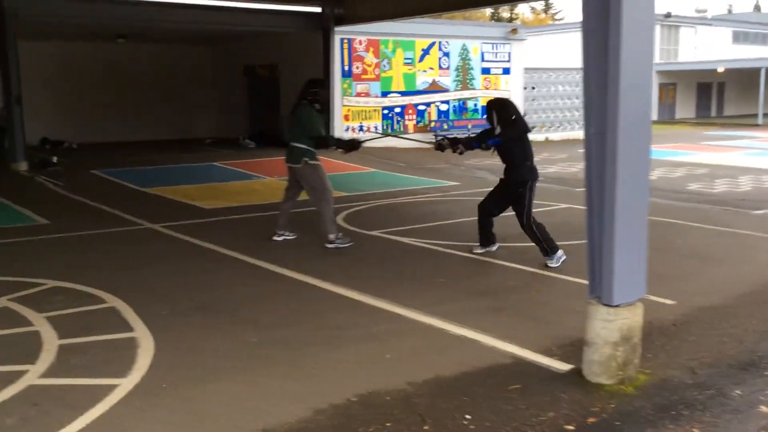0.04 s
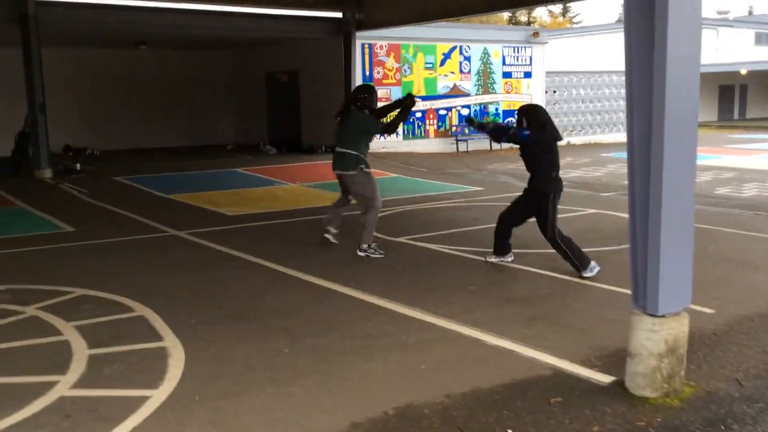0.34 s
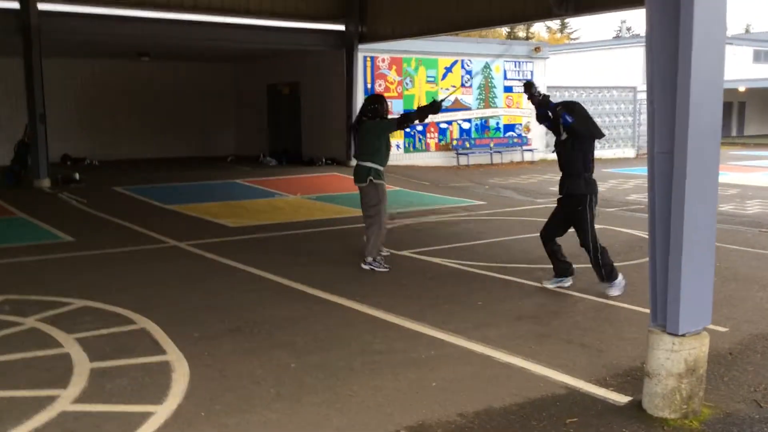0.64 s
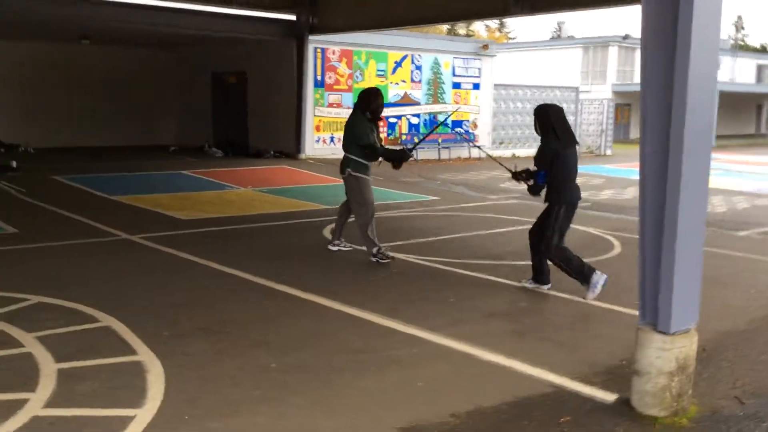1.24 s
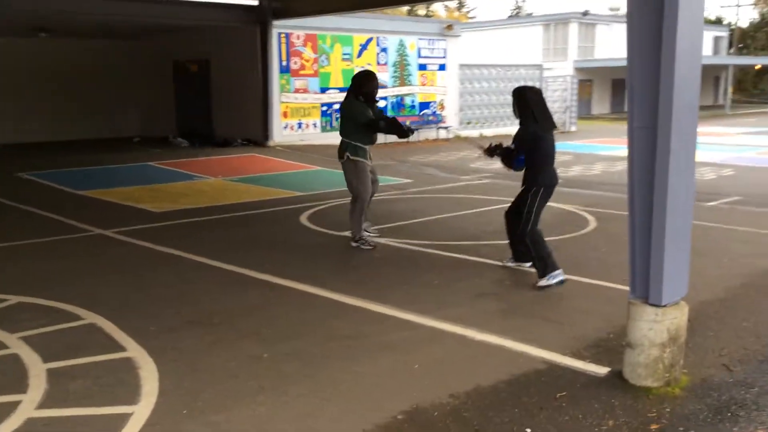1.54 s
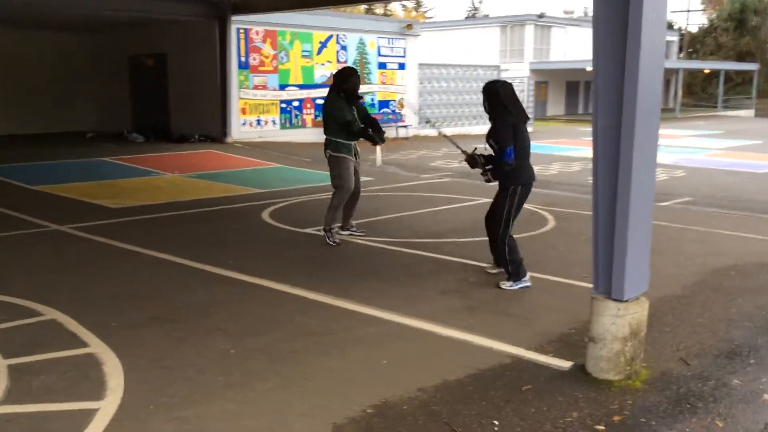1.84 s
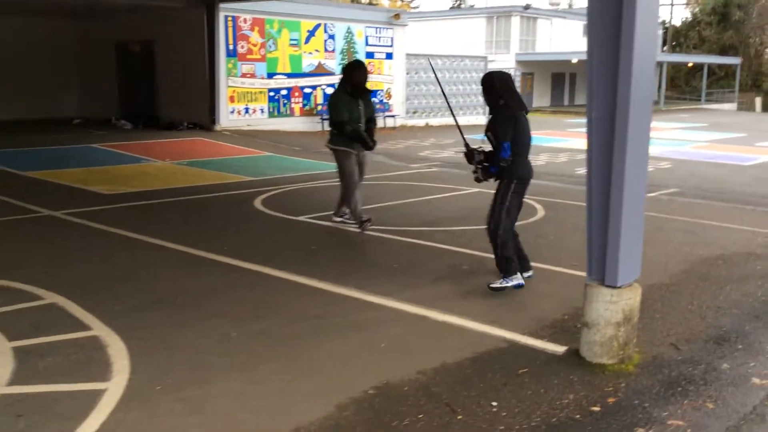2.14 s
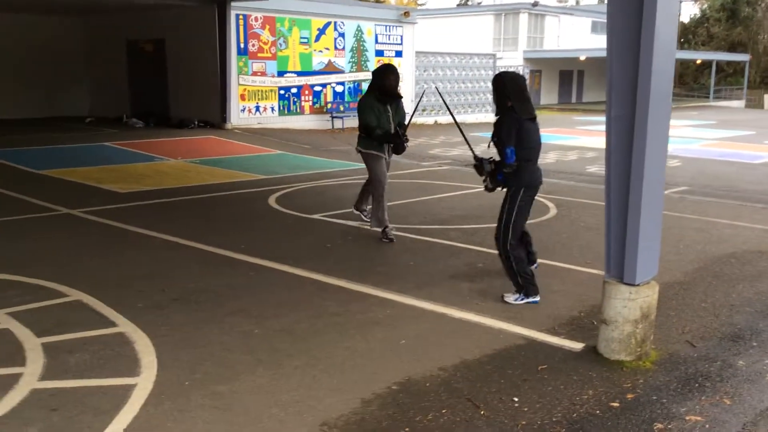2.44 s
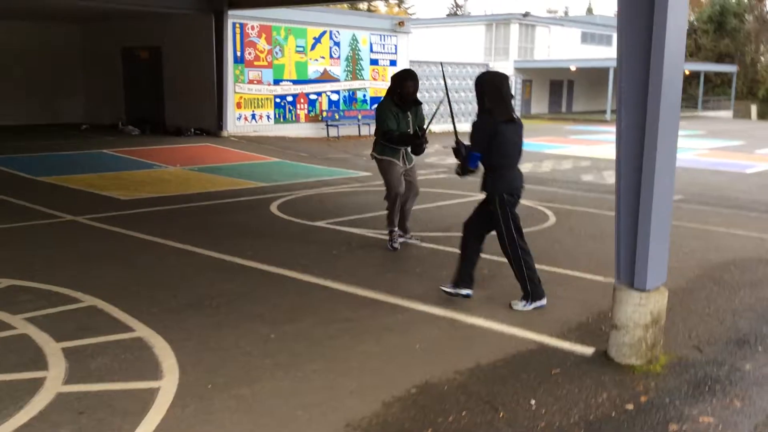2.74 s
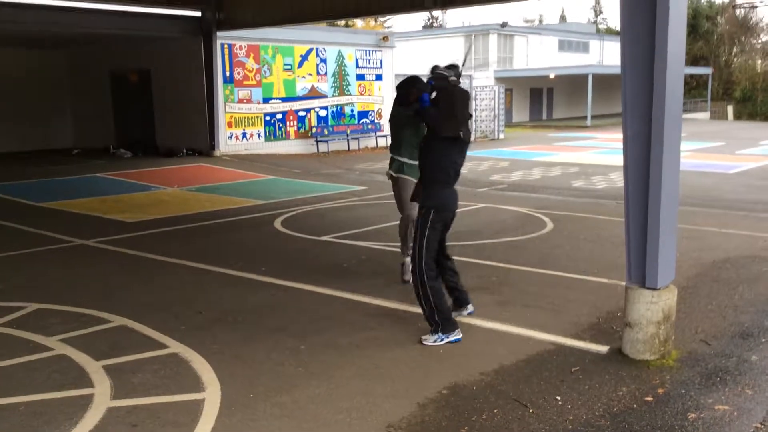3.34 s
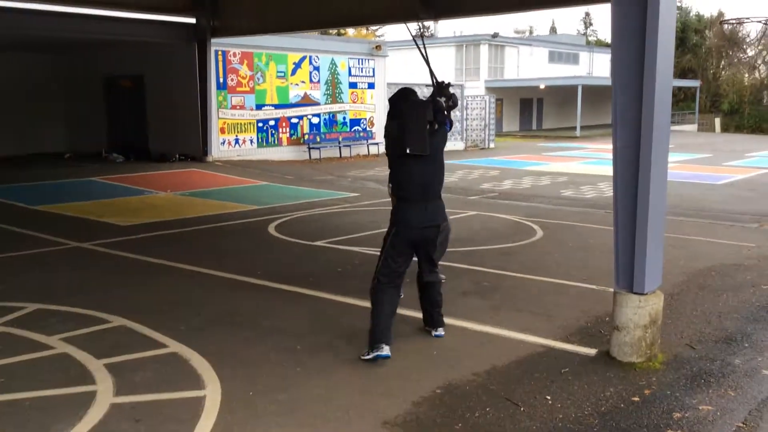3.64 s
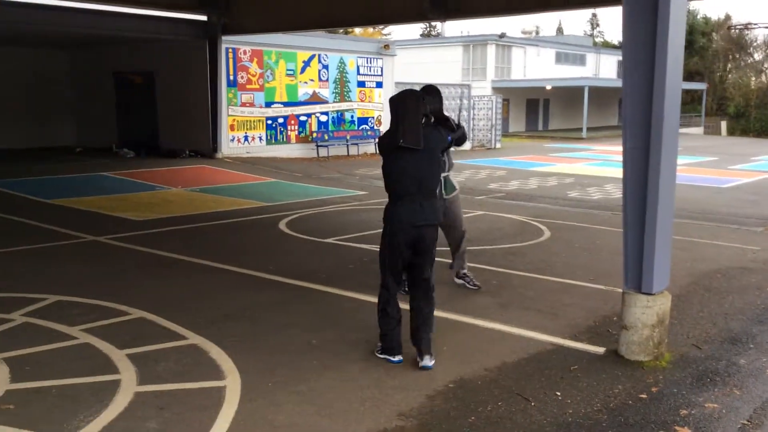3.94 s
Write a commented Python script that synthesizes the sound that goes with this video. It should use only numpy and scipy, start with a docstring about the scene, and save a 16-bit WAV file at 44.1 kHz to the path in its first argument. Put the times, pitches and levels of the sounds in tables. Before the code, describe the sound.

Steel swords clash and scrape, ringing under an echoing roof, with soft footsteps.

```python
"""On a roofed outdoor court, two fencers spar with steel swords a few metres away.
The blades clash, chatter and slide along each other, which sets them and their hand guards ringing.
The roof and walls answer with a long, bright echo. Shoes pad and scuff on the asphalt,
dull knocks sound close by, and the town rumbles far off."""
import sys
import numpy as np
from scipy import signal
from scipy.fft import rfft, irfft
from scipy.io import wavfile
from scipy.ndimage import map_coordinates

SR = 44100
rng = np.random.default_rng(int(sys.argv[2]) if len(sys.argv) > 2 else 0)


def unload_wav(signal):
    """Save mono or channel-first audio to the path in sys.argv[1] as 16-bit WAV at rate SR, clipped to [-1, 1]."""
    wavfile.write(
        sys.argv[1],
        SR,
        np.round(np.clip(np.atleast_2d(signal).T, -1, 1) * 32767).astype(np.int16),
    )


N = 176400


def undb(db):
    """Turn decibels (dB) into a number to multiply by."""
    return 10 ** (np.asarray(db) / 20)


def unit(x):
    """Scale a sound so that its energy is 1."""
    return x / np.sqrt(np.sum(x ** 2))


def seconds(length):
    """The time of each sample, in seconds."""
    return np.arange(int(length * SR)) / SR


def fade(t, ring_s):
    """Die away by 60 dB every ring_s seconds."""
    return np.exp(-np.log(1000) * t / ring_s)


def add(out, at, x):
    """Mix x into out, starting at a time in seconds."""
    i = int(round(at * SR))
    x = x[max(-i, 0):N - i]
    out[max(i, 0):max(i, 0) + len(x)] += x


def colour(hz, table):
    """How strong each pitch is, read smoothly between the rows of a table."""
    points, db = np.array(table).T
    return undb(np.interp(np.log(hz + 1), np.log(points), db))


# The tone of the town. Each row: pitch in Hz, relative level in dB.
TOWN_COLOUR = [(15, -49), (25, -8.5), (130, -2), (301, -14), (363, -16), (503, -16), (734, -10),
               (1190, -15.5), (2160, -17.5), (3820, -30.5), (4490, -36.5), (14000, -43.5), (16000, -65)]

def town(level_db=-47.5, wander_db=-1.5):
    """The far-off town is a low noise that wanders a little in loudness."""
    hz = np.fft.rfftfreq(N, 1 / SR)
    rumble = irfft(rfft(rng.standard_normal(N)) * colour(hz, TOWN_COLOUR), N)
    wander = np.interp(np.arange(N), np.linspace(0, N, 20), rng.standard_normal(20))
    return unit(rumble) * np.sqrt(N) * undb(level_db + wander_db * wander)


# The tone of the echo under the roof. Each row: pitch in Hz, relative level in dB.
ECHO_COLOUR = [(150, -1.5), (1000, 0.5), (2500, 1.5), (5000, 1), (9000, -2), (15000, -4)]

def court_echo(x, level_db=-4, bass_ring_s=1.277, build_s=.0057):
    """Countless bounces blur into one long echo; the air soaks up the high notes first."""
    t = seconds(2)
    hz, age, noise = signal.stft(rng.standard_normal(len(t)), SR, nperseg=256)
    ring_s = bass_ring_s / (1 + hz / 9500)  # half as long at 9500 Hz
    fading = noise * colour(hz, ECHO_COLOUR)[:, None] * fade(age, ring_s[:, None])
    tail = signal.istft(fading, SR)[1][:len(t)] * (1 - np.exp(-t / build_s))
    return signal.fftconvolve(x, undb(level_db) * unit(tail))[:N]


# Bounces off the ground, a pillar and the roof. Each row: delay in seconds, level in dB.
BOUNCES = [(.0033, -7.5), (.011, -12.5), (.019, -12.5)]

def with_bounces(x):
    """The sound arrives directly, then as quieter copies from nearby surfaces."""
    out = x.copy()
    for delay, db in BOUNCES:
        add(out, delay, undb(db) * x)
    return out


# Shoes on asphalt. Each row: start in seconds, thud level in dB, scuff level in dB.
FOOTFALLS = [(.005, -40.5, -54), (0.124, -39, -60), (.235, -36, -58), (.61, -39, -59), (.905, -44, -66),
             (1.266, -39.5, -68), (2.07, -50, -53.5), (2.40, -52.5, -88), (2.611, -51.5, -51),
             (3.28, -39, -34.5)]

def footsteps(thud_hz=93.4, thud_s=.018, scuff_hz=2000, scuff_s=.015):
    """The heel thuds and the sole scuffs: one low and one high puff of noise."""
    out, t = np.zeros(N), seconds(.43)
    for at, thud_db, scuff_db in FOOTFALLS:
        for hz, length, db in (thud_hz, thud_s, thud_db), (scuff_hz, scuff_s, scuff_db):
            band = signal.butter(2, [hz / 2, hz * 2], "band", fs=SR, output="sos")
            noise = unit(signal.sosfilt(band, rng.standard_normal(len(t)))) * np.sqrt(len(t))
            swell = 2 * t / length * np.exp(1 - 2 * t / length)
            add(out, at, undb(db) * noise * swell)
    return out


# Close knocks. Each row: time in seconds, strength (minus flips the wave),
# pulse width in milliseconds, hollow ring compared with the pulse in dB.
CLOSE_KNOCKS = [(.303, 0.032, 0.43, -5.5), (.714, 0.038, .55, -12), (1.351, 0.094, 0.1, -21),
                (1.460, 0.055, 0.24, -3.5), (1.668, 0.085, 0.41, -6), (1.858, .035, 0.36, -4),
                (2.147, 0.24, 0.23, -10), (2.1494, 0.069, 1, -24), (2.9659, -.55, 0.59, -33),
                (3.014, 0.052, .6, -9), (3.516, 0.15, 0.23, -21), (3.5173, .21, 0.55, -27)]

def knocks(ring_hz=265, ring_decay_s=.0028, rebound=3.93, top_hz=1250):
    """A rounded pulse, a slower rebound and a hollow ring, too close to raise an echo."""
    out, t = np.zeros(N), seconds(.1) - .02
    age = np.maximum(t, 0)
    hollow = np.sin(2 * np.pi * ring_hz * age) * np.exp(-age / ring_decay_s)
    for at, strength, width_ms, ring_db in CLOSE_KNOCKS:
        widths = t * 1000 / width_ms
        pulse = np.exp(-widths ** 2 / 2) - np.exp(-(widths / rebound) ** 2 / 2) / rebound
        add(out, at + t[0], strength * (pulse / pulse.max() - undb(ring_db) * hollow))
    return signal.sosfiltfilt(signal.butter(4, top_hz, fs=SR, output="sos"), out)


def singing_blade(start_s=.62, hz=4012, level_db=-41, ring_s=1.9, wobble_hz=9):
    """A blade freed after a parry sings on with a thin, wobbling tone."""
    out, t = np.zeros(N), seconds(1)
    wobble = 1 + .5 * np.sin(2 * np.pi * wobble_hz * t)
    add(out, start_s, undb(level_db) * wobble * np.sin(2 * np.pi * hz * t) * fade(t, ring_s))
    return out


def slips(samples, clicks_per_s=2200, scatter_db=7):
    """Steel catches on steel and lets go, making dense, uneven clicks."""
    clicks = rng.random(samples) < clicks_per_s / SR
    size = undb(scatter_db * rng.standard_normal(samples))
    sign = rng.choice([-1, 1], samples)
    return unit(clicks * sign * size) * np.sqrt(samples)


def tilt(hz, bright_db):
    """Brightness: each octave up gains bright_db, while 4500 Hz stays the same."""
    return undb(bright_db * np.log2(hz / 4500))


def ring(notes, bright_db, ring_s, mistune=.003, scatter_db=2.5):
    """Steel rings at its own notes; grip and point of contact vary them a little each time."""
    hz, db = np.array(notes, float).T[:, :, None]
    t = seconds(ring_s)
    hz = hz * (1 + mistune * rng.standard_normal(hz.shape))
    gain = unit(undb(db + scatter_db * rng.standard_normal(hz.shape))) * tilt(hz, bright_db)
    phase = 2 * np.pi * (hz * t + rng.random(hz.shape))
    return np.sum(gain * np.sin(phase), 0) * np.sqrt(2) * unit(fade(t, ring_s))


# The tone of struck steel. Each row: pitch in Hz, relative level in dB.
STEEL_COLOUR = [(300, -30), (900, -22.5), (1750, -4), (2500, -3.5), (3500, 0), (5000, -7), (6200, -6),
                (10000, -2.5), (15000, -8)]

def steel_burst(bright_db, ring_s=.02, lag_s=.0007995):
    """A crowd of very short notes; the high ones run along the blade faster and arrive first."""
    size = 8192
    t, hz = np.arange(size) / SR, np.fft.rfftfreq(size, 1 / SR) + 1
    burst = unit(rng.standard_normal(size) * fade(t, ring_s))
    tone = unit(colour(hz, STEEL_COLOUR)) * np.sqrt(len(hz)) * tilt(np.maximum(hz, 1000), bright_db)
    lag_cycles = lag_s * (2 * np.sqrt(10000 * hz) - .8 * hz)
    return irfft(rfft(burst) * tone * np.exp(-2j * np.pi * lag_cycles))


# Notes of the guards and the stiff part of the blades. Each row: pitch in Hz, relative level in dB.
GUARD_NOTES = [(1986, -10), (2066, -9), (3184, -6), (3312, -3), (3461, 2), (3580, -1), (3705, -4),
               (4029, -7), (4293, -9), (4612, -10)]
# High notes of the blades. Each row: pitch in Hz, relative level in dB.
BLADE_NOTES = [(5437, -7), (5848, -2), (6280, -1), (6745, -2), (6860, -4), (7350, -7), (7765, 2),
               (8250, -3), (8578, -3), (9160, -6), (11950, -11), (13380, -7), (14090, -9)]

def swords(push, bright_db, guard_db, blade_db):
    """Every push on the steel sets off a short burst and rings the guards and blades."""
    body = np.zeros(SR // 2)
    add(body, 0, steel_burst(bright_db))
    add(body, 0, undb(guard_db - 7.5) * ring(GUARD_NOTES, bright_db, ring_s=.17))
    add(body, 0, undb(blade_db - 6) * ring(BLADE_NOTES, bright_db, ring_s=.04))
    return signal.fftconvolve(push, body)


# Notes of the blade beyond the sliding contact. Each row: pitch in Hz, relative level in dB.
RASP_NOTES = [(1450, -6.5), (1900, -8.5), (2500, 1.5), (3050, -1), (3750, 6), (4400, 4), (6400, -2),
              (7900, -22.5), (9400, 5)]

def rasp(t, glide, bright_db, level_db=-1.5):
    """A rasp that glides in pitch as the contact travels along the blade."""
    steady = signal.fftconvolve(slips(SR), ring(RASP_NOTES, bright_db, ring_s=.022))
    speed = 2 ** (glide * t)  # reading faster raises the pitch
    return undb(level_db) * map_coordinates(steady, [np.cumsum(speed)], mode="mirror")


# Blade sliding on blade. Each row: time of hardest pressure, rise and fall, all in seconds,
# relative level in dB, brightness in dB per octave, guard ring and blade ring in relative dB,
# pitch glide in octaves per second.
BLADE_SCRAPES = [(.485, 0.023, .02, -9.5, 0, 9, 6.5, 1), (.625, 0.035, 0.12, -6, -5.5, -1, -15, 0.5),
                 (.755, 0.094, 0.029, -13, 0, 4, 9.5, 1.1), (1.705, 0.063, 0.03, -3, 0.5, 2.5, 3.5, -0.5),
                 (3.08, 0.066, 0.09, -7.5, -4.5, 1, 6, -1), (3.18, 0.08, 0.058, -5, -5.5, 4, -6, -2.5),
                 (3.515, 0.031, 0.015, -6, -4.5, -5, 5.5, 2), (3.679, 0.051, 0.06, -7.5, -3.5, 3, -10, 6),
                 (3.732, 0.025, 0.024, 7, -1, 3.5, 9, 3.3), (3.778, 0.022, 0.062, 1.5, -0.5, 7.5, -13, -3)]

def scrapes(level_db=-30):
    """Tiny slips swell and fade with the pressure between the blades."""
    out, t = np.zeros(N), seconds(1) - .5
    for at, rise, fall, db, bright_db, guard_db, blade_db, glide in BLADE_SCRAPES:
        pressure = undb(level_db + db) * np.exp(-np.maximum(-t / rise, t / fall))
        add(out, at + t[0], swords(pressure * slips(len(t)), bright_db, guard_db, blade_db))
        add(out, at + t[0], pressure * rasp(t, glide, bright_db))
    return out


# Blade hitting blade. Each row: start in seconds, relative level in dB, brightness in dB per octave,
# guard ring and blade ring in relative dB, fading time of the chatter in seconds.
BLADE_CLASHES = [(0.056, -3.5, 0, 0, 3, 0.0049), (.157, -15.5, -3, -2, -4, 0.01),
                 (.171, -14, -4, -13, -2, 0.0066), (.408, -8.5, -3, 0, -10, 0.0059),
                 (.583, -18, -4.5, 2, 8, 0.01), (1.3577, -7, 1, 3, -21, 0.0033),
                 (1.463, -14, -2, -17, 4, .008), (2.773, -12.5, 0, 1.5, 8, 0.0038),
                 (2.921, -21.5, -1.5, 9.5, 2, 0.003), (3.466, -17, -6, 2.5, -16, 0.014),
                 (3.859, -15.5, -3.5, -16, -13.5, 0.0052)]

def clashes(level_db=14, chatter_db=7):
    """The blades hit hard, then chatter against each other for a few milliseconds."""
    out, t = np.zeros(N), seconds(.1)
    for at, db, bright_db, guard_db, blade_db, chatter_s in BLADE_CLASHES:
        push = undb(chatter_db) * unit(slips(len(t)) * np.exp(-t / chatter_s))
        push[0] += 1  # the first hit
        add(out, at, undb(level_db + db) * swords(unit(push), bright_db, guard_db, blade_db))
    return out


def scene():
    """Swords and feet echo under the roof, with knocks up close and the town behind."""
    scrapes_and_feet = scrapes() + footsteps()
    directions = 3  # a clash sends a different ring each way
    echo = sum(court_echo(clashes() + scrapes_and_feet) for _ in range(directions))
    fencers = with_bounces(clashes() + scrapes_and_feet)
    return (fencers + echo / np.sqrt(directions) + singing_blade() + knocks() + town())[None]


def record(dry, low_hz=56, top_hz=15100):
    """Thin out the deepest bass and cut off the highest treble."""
    thinned = signal.sosfilt(signal.butter(2, low_hz, "high", fs=SR, output="sos"), dry)
    return signal.sosfilt(signal.ellip(8, .2, 70, top_hz, fs=SR, output="sos"), thinned)


dry = scene()
out = record(dry)
unload_wav(out)
```